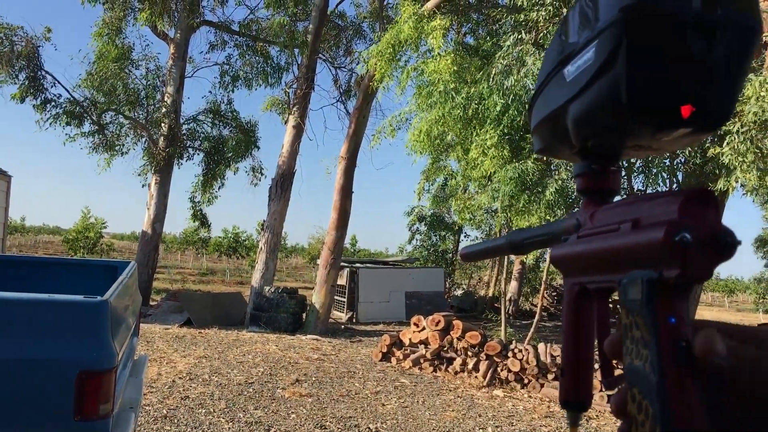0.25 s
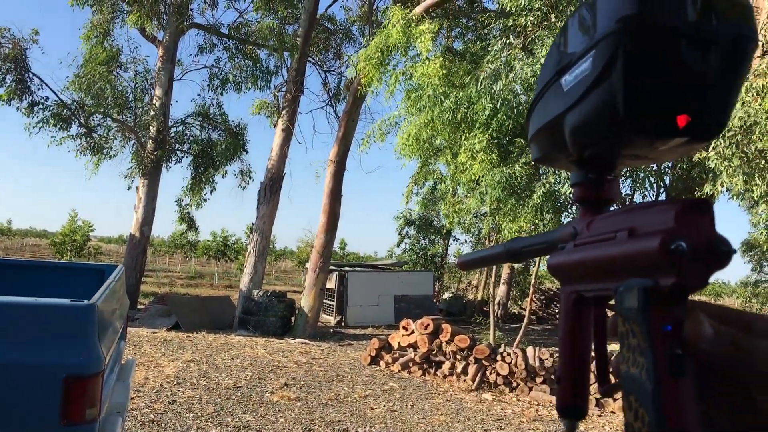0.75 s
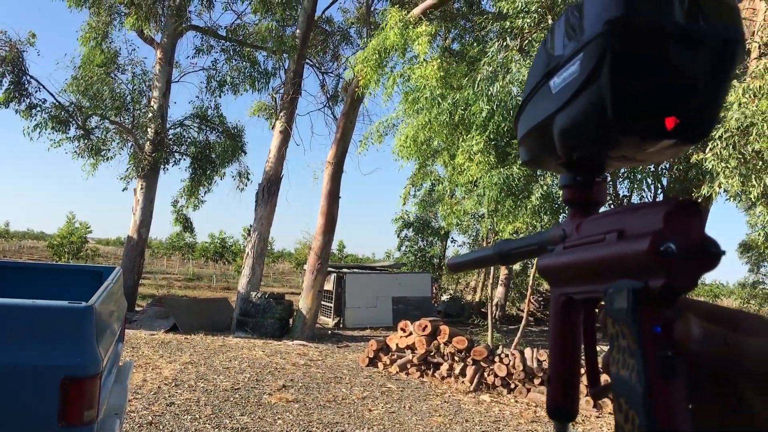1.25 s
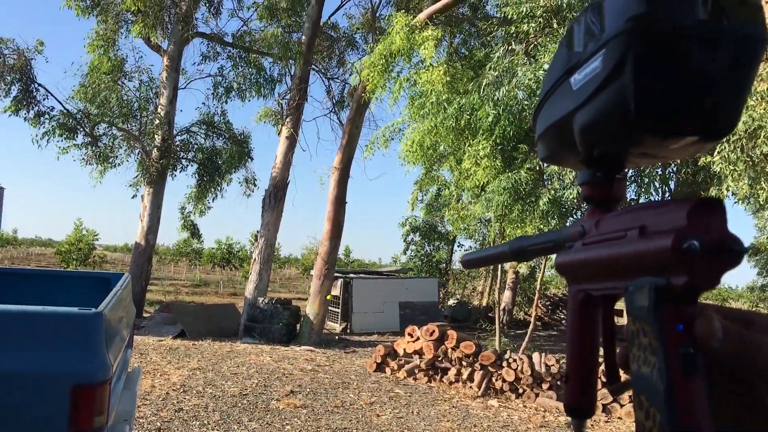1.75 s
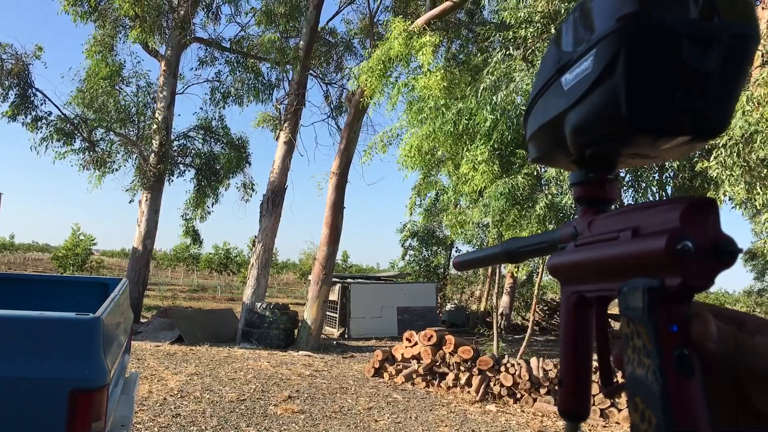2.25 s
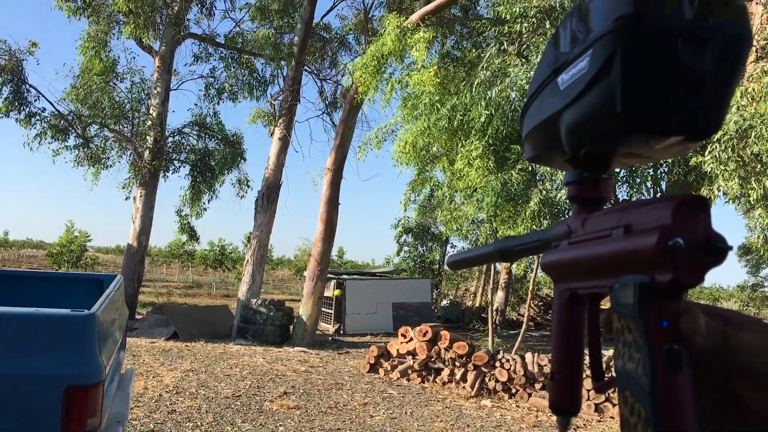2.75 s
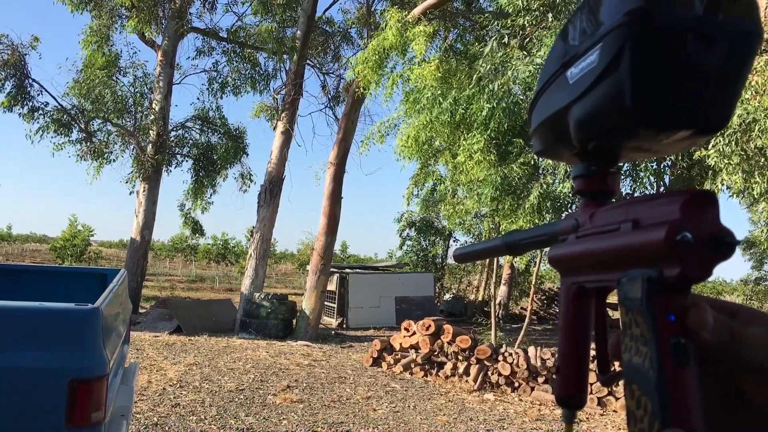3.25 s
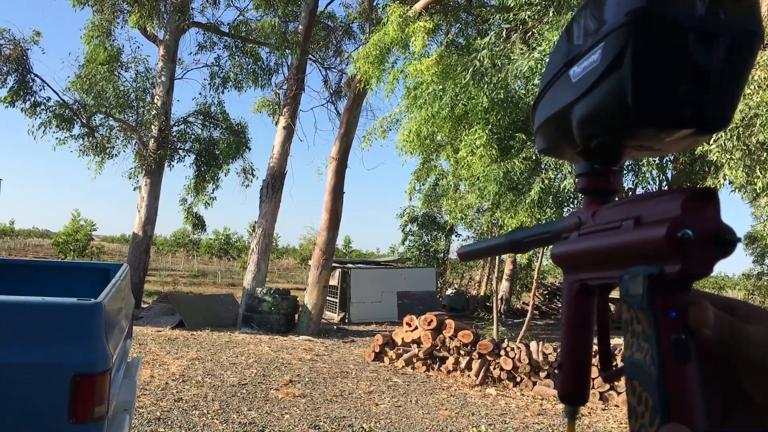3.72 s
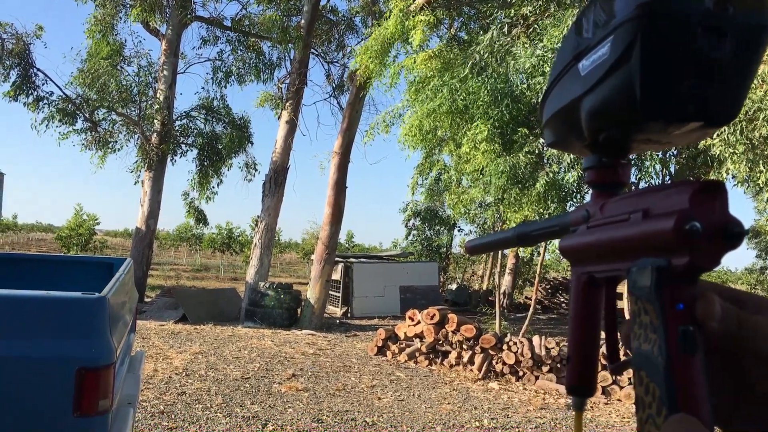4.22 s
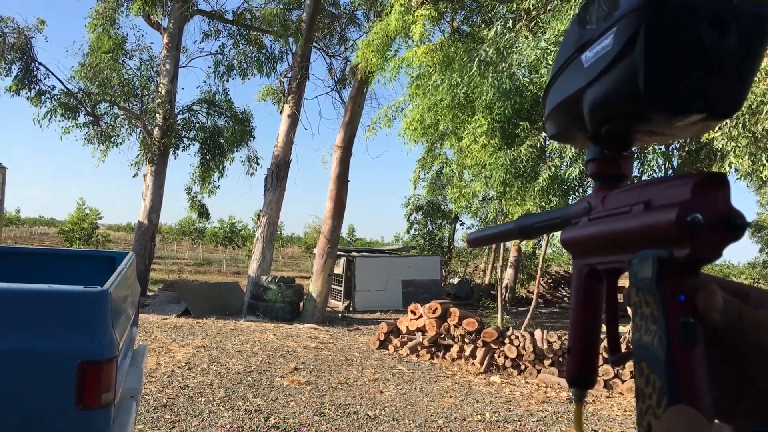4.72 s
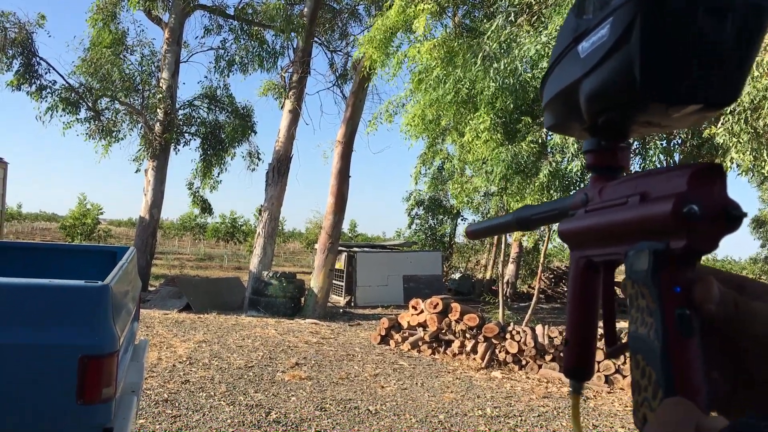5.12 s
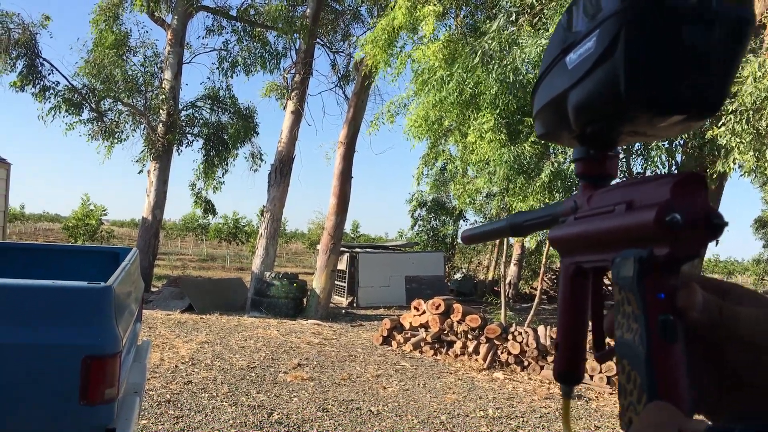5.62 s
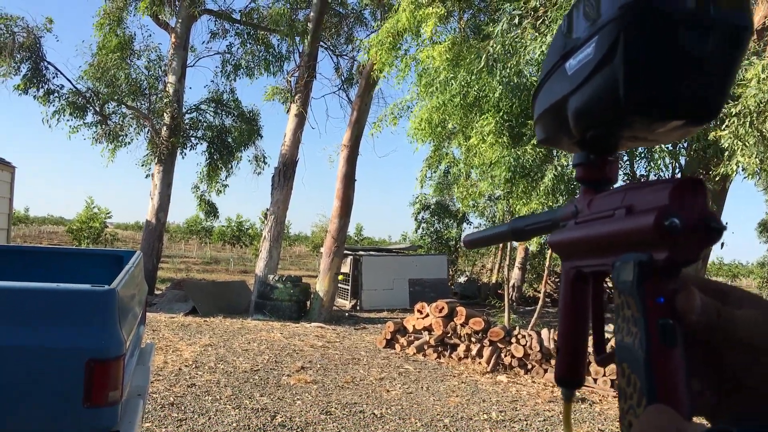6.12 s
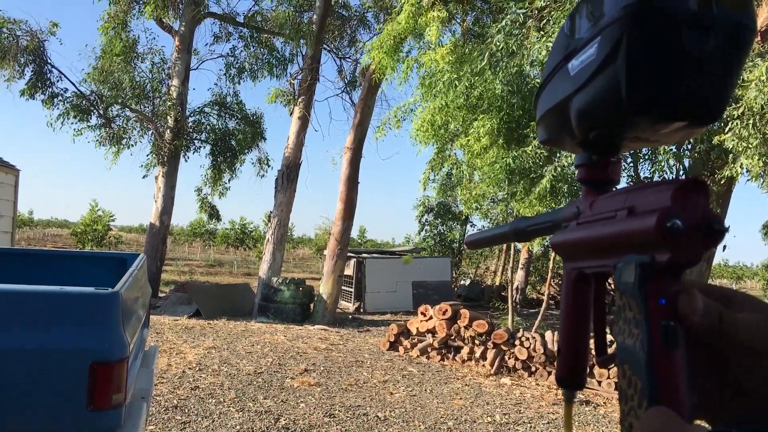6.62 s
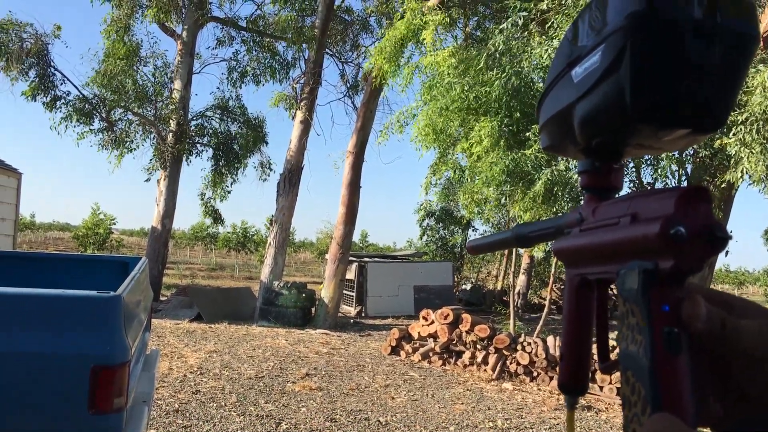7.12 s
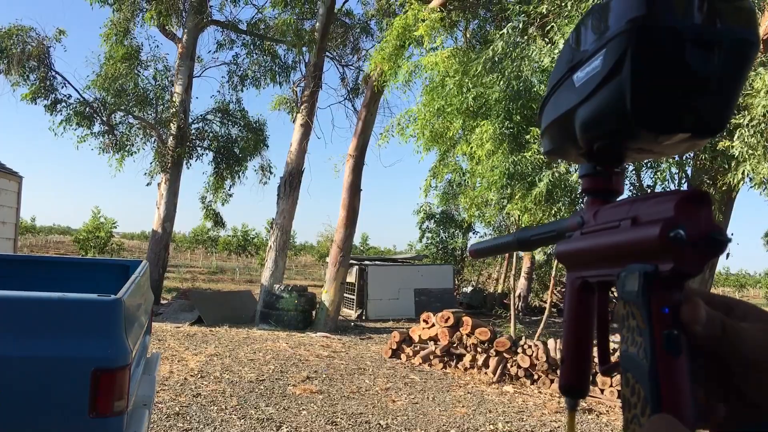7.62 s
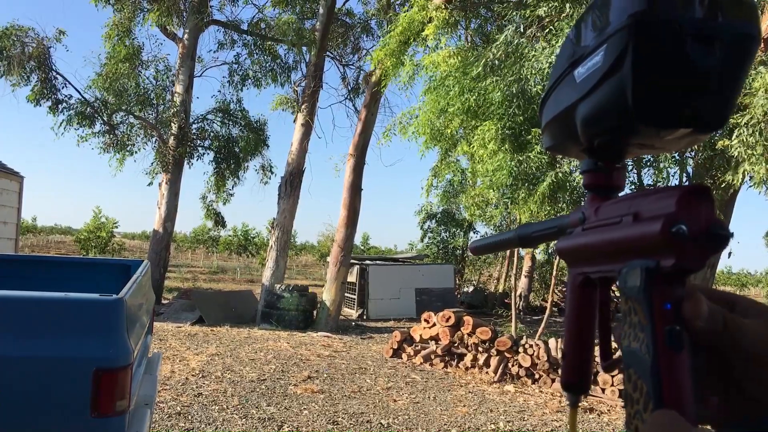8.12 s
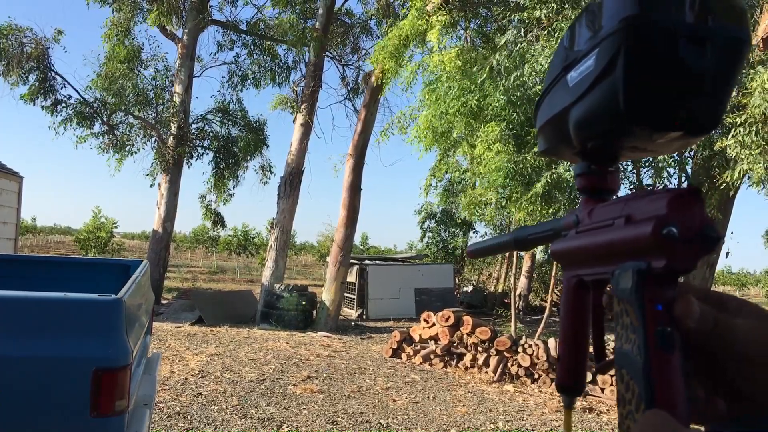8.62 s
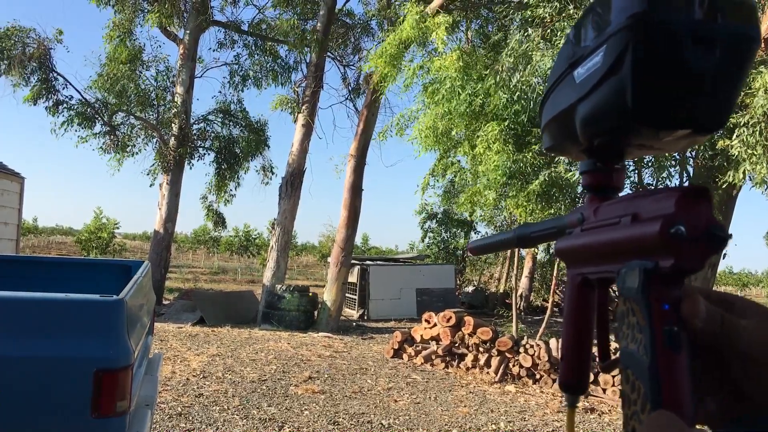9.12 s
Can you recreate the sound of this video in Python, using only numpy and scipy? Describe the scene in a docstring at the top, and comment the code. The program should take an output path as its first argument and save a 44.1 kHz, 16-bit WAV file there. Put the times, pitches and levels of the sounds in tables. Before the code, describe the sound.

Close electronic paintball gun outdoors: two single popping shots about a second apart, then a long rapid string of uneven clacking cracks and thumps.

```python
"""Paintball marker in a yard

A close electronic paintball marker fires two single shots, then a long string of up to 15 a second.
Each cycle is a clack of the bolt (a damped ring and noise), a crack and pop of gas with a sinking microphone
thump, a leak of gas and the bolt's return, all in noise bursts and rings; hard and soft shots alternate.
Faint random clicks fall between shots, balls smack and spatter on a target; decaying noise echoes are the trees.
Behind lie coloured noise for light wind, far air and hiss, soft handling knocks and one faint swept chirp.
"""
import sys
import numpy as np
from scipy import signal
from scipy.fft import rfft, irfft
from scipy.io import wavfile
from scipy.ndimage import uniform_filter1d

SR = 44100
rng = np.random.default_rng(int(sys.argv[2]) if len(sys.argv) > 2 else 0)


def unload_audio(sound):
    """Save the sound as a 16-bit wav file, at the path given as the first command line argument."""
    columns = np.transpose(np.atleast_2d(sound))
    # keep every value between -1 and 1, then stretch to whole-number steps
    steps = np.round(np.clip(columns, -1, 1) * 32767)
    wavfile.write(sys.argv[1], SR, steps.astype(np.int16))


N = 412776
T = np.arange(4096) / SR  # time within one short sound (s)
LEVEL_SAMPLES = 176  # the level of a short sound is its energy spread over this many samples
REST_S = .5  # after a longer pause than this the next shot is a first shot

# Pulls of the trigger. Each row: time in seconds, thump level in dB before the thump's own gain,
# pop level in dB before its trim, nominal pop pitch in Hz.
SHOTS = [(0.0396, -5.5, -17, 800), (1.0009, -1, -8, 980), (1.7368, -1.5, -7.5, 900),
         (1.8336, -1.0, -14, 750), (1.9128, -5.5, -15, 1090), (2.0005, -3.5, -7.5, 850),
         (2.0761, -5, -17, 656), (2.1572, -6, -11, 720), (2.2324, -6.5, -9, 980), (2.299, -1.5, -10.5, 650),
         (2.3716, -7, -32, 960), (2.4385, -4.5, -9, 680), (2.5354, -0.5, -10, 930),
         (2.6139, -2.5, -6.5, 796), (2.7094, -9, -20, 890), (2.7764, -12, -19, 980),
         (2.8433, -8.5, -20, 1030), (2.91, -4.5, -13.5, 930), (2.9771, -6, -11.5, 920),
         (3.044, -1, -2.5, 730), (3.1117, -6, -11.5, 820), (3.1787, -4.5, -8.5, 660),
         (3.2511, -7, -16, 880), (3.3176, -2, -13, 850), (3.3856, -1.5, -12.5, 1130), (3.4515, -2, -8, 720),
         (3.5523, -5, -19, 900), (3.6362, -2.5, -12, 600), (3.7179, -6, -10, 880), (3.7845, -1.5, -9, 610),
         (3.852, -6, -16, 776), (3.9216, -4.0, -8, 650), (3.9892, -10, -16, 815), (4.0559, -7.5, -7.5, 630),
         (4.1234, -6.0, -25, 880), (4.19, -3.5, -8.5, 670), (4.258, -7, -16, 780),
         (4.3631, -3.5, -7.5, 715), (4.4357, -4, -33, 1020), (4.5107, -2.5, -8, 694),
         (4.5844, -1.5, -14, 1010), (4.6507, -1, -7.5, 690), (4.7184, -6, -11, 910), (4.785, -4.0, -7, 740),
         (4.856, -5, -19, 656), (4.9301, -2.5, -8.5, 720), (4.9977, -4.5, -13.5, 740),
         (5.0643, -2.5, -7, 740), (5.132, -5.5, -23, 1020), (5.2045, -3.5, -7.5, 880),
         (5.2743, -4, -10, 980), (5.3436, -2, -10.5, 700), (5.4133, -6, -10.5, 810),
         (5.4803, -3, -10.5, 620), (5.5536, -4, -13, 910), (5.6225, -2.0, -7.5, 856), (5.69, -7, -23, 950),
         (5.7644, -1, -8.5, 550), (5.8329, -4, -11.5, 950), (5.9005, -3, -5.5, 710), (5.9702, -5, -14, 870),
         (6.0372, -3, -7.5, 610), (6.1364, -1, -14.5, 970), (6.205, -0.5, -8, 600),
         (6.2807, -2.5, -11.5, 1010), (6.3478, -2.5, -9, 760), (6.415, -5.5, -19, 860),
         (6.4821, -4.5, -9, 614), (6.5497, -12, -13, 890), (6.6167, -7, -26, 740), (6.6861, -1.5, -8, 740),
         (6.7538, -5.5, -10.5, 940), (6.8203, -1.5, -15, 775), (6.8882, -5.5, -12, 1010),
         (6.9548, -2, -8, 800), (7.022, -2.0, -31, 670), (7.089, -1, -16, 900), (7.1565, -2.5, -12.5, 1080),
         (7.2292, -1.5, -12, 715), (7.311, -5, -10.5, 910), (7.3774, -1.5, -11.5, 750),
         (7.448, -5.5, -15, 740), (7.552, -4.5, -7, 970), (7.6271, -7.5, -17, 1070), (7.696, -2, -8.5, 980),
         (7.7633, -5, -9.5, 1240), (7.8298, -4.5, -12.5, 920), (7.8974, -13, -17, 890),
         (7.969, -9, -12.5, 1050), (8.0357, -1, -8.5, 644), (8.103, -2.5, -30, 760),
         (8.1756, -1.5, -15, 670), (8.2551, -2.5, -31, 680), (8.3298, -1.5, -11, 630),
         (8.398, -5.5, -11, 815), (8.4643, -2, -12, 810), (8.5584, -1.5, -12, 620), (8.6723, -2.5, -8, 900),
         (8.745, -2, -13.5, 930), (8.8377, -2.5, -7, 810), (8.9054, -6.0, -18, 804),
         (8.9723, -8.5, -11, 860), (9.0394, -8.5, -11, 720), (9.109, -8.5, -11, 970),
         (9.1787, -4, -7.5, 720), (9.2542, -14, -10, 860), (9.3317, -7, -13, 820)]
# Target hits heard clearly, louder or in a pause. Each row: time in seconds, reference level in dB.
CLEAR_HITS = [(0.207, -17), (1.171, -22.5), (2.335, -30), (3.893, -36), (5.943, -35), (7.802, -32),
              (8.509, -33), (8.643, -36), (8.731, -33), (9.083, -34)]
# Colour of the returning bolt and of faint clicks. Each row: frequency in Hz, relative level in dB per Hz.
BOLT_AND_CLICK_COLOUR = [(150, 13.5), (700, -7), (1400, 0.5), (2200, -5.5), (3200, -4.5), (4400, -0.5),
                         (5200, -5), (7300, -6), (9500, -5), (10400, -7), (16000, -14.5)]


def amp(db):
    """Decibels to gain."""
    return 10 ** (np.asarray(db) / 20)


def read(points, hz):
    """A spectrum joined by straight lines on a log-frequency axis."""
    f, db = np.transpose(points)
    return np.interp(np.log(hz + 1), np.log(f + 1), db)


def add(mix, s, sound):
    """Mixes a sound in at time s."""
    part = mix[max(round(s * SR), 0):][:len(sound)]
    part += sound[:len(part)]


def sized(x):
    """Gives a short sound a level of 0 dB."""
    return x * np.sqrt(LEVEL_SAMPLES / (np.sum(x ** 2) + 1e-20))


def causal(points):
    """Minimum-phase response with this colour: it starts sharply and rings afterwards."""
    log_gain = np.log(amp(read(points, abs(np.fft.fftfreq(len(T), 1 / SR)))))
    return np.exp(signal.hilbert(log_gain).conj())[:len(T) // 2 + 1]


def puff(colour, rise, decay, ragged_db=3.0):
    """A ragged burst of turbulence that swells, dies away (both in seconds) and is coloured."""
    envelope = np.minimum(T / rise, 1) * np.exp(-np.maximum(T - rise, 0) / decay)
    eddies = uniform_filter1d(rng.standard_normal(len(T)), size=20)
    rush = amp(ragged_db * eddies / eddies.std()) * rng.standard_normal(len(T))
    return sized(irfft(rfft(envelope * rush) * colour))


def ring(hz, rise, decay, detune=.012):
    """One damped resonance, a little different in pitch and phase at every blow."""
    turns = hz * (1 + detune * rng.standard_normal()) * T + rng.random()
    envelope = (1 - np.exp(-T / rise)) * np.exp(-T / decay)
    return sized(envelope * np.sin(2 * np.pi * turns))


def noise(points):
    """Steady noise of rms 1 with this colour."""
    gain = amp(read(points, np.fft.rfftfreq(N, 1 / SR)))
    x = irfft(rfft(rng.standard_normal(N)) * gain, N)
    return x / x.std()


def marker():
    """Each cycle: bolt forward, gas out, valve shut, bolt back. Returns the sharp sounds and the thumps."""
    # Colours of the gas crack, leaking gas, bolt clack and a hollow knock.
    # Each row: frequency in Hz, relative level in dB per Hz.
    crack_colour = [(200, 9.5), (900, 0.5), (1600, 2), (2200, 1), (2900, -1.5), (3700, 0.5), (4900, -6),
                    (7000, -2), (8000, -6.5), (9400, -3), (10400, -9.5), (11700, -6.5), (13800, -5),
                    (16000, -22.5)]
    leak_colour = [(150, 14), (600, 11), (1300, 5), (2200, -5.5), (3800, 2), (4800, -2.5), (6800, -7.5),
                   (9300, 0), (10400, -6), (12000, -2), (16000, -4.5)]
    clack_colour = [(100, 21), (280, -10), (450, 9), (700, -15), (1050, -1), (1250, -22), (1600, 11),
                    (2100, -21), (3500, -15), (7000, -15), (16000, -26)]
    hollow_colour = [(150, 2), (300, 9), (500, 3), (750, -3), (1000, -2), (1400, -17), (2000, 1),
                     (5000, -24.5), (16000, -47)]
    crack, leak, clack = causal(crack_colour), causal(leak_colour), causal(clack_colour)
    hollow, back = causal(hollow_colour), causal(BOLT_AND_CLICK_COLOUR)
    sharp, low = np.zeros(N), np.zeros(N)
    for shot, (rested, hard, early_db) in zip(SHOTS, cycles()):
        s, thump_db = shot[:2]
        if rested:
            first_clatter(sharp, low, s, crack, back, leak, hollow)
        bolt_forward(sharp, s, rested, early_db, clack)
        muzzle_blast(sharp, shot, rested, hard, crack, leak)
        # hard and soft shots thump in opposite directions
        add(low, s, -hard * amp(thump_db) * thump(stretch=1.12 if rested else 1))
        valve(sharp, s, crack, leak)
        bolt_return(sharp, s, rested, early_db, back)
    return sharp, low


def cycles():
    """Rows: after a rest?, hard (1) or soft (-1), extra dB of bolt sound early in a string, fading."""
    start_db, fade_s = 6, 0.65  # extra bolt sound at the start of a string, and its time constant
    dud_db = -12.3  # a hard shot follows one with less thump than this
    rows, last_s, last_db, first_s, hard = [], -np.inf, 0, 0, 1
    for s, thump_db, _, _ in SHOTS:
        rested = s - last_s > REST_S
        first_s = s if rested else first_s
        hard = 1 if rested or last_db < dud_db else -hard
        rows.append((rested, hard, start_db * np.exp(-(s - first_s) / fade_s)))
        last_s, last_db = s, thump_db
    return rows


def first_clatter(sharp, low, s, crack, back, leak, hollow):
    """After a rest the trigger and the bolt clatter far more, with a hollow knock."""
    add(sharp, s - .023, amp(-36) * puff(crack, rise=0.00067, decay=0.0054))
    add(sharp, s - .0145, amp(-23.0) * puff(back, rise=.002, decay=0.018))
    add(sharp, s + .02, amp(-22.5) * puff(leak, rise=0.0033, decay=0.036))
    add(sharp, s - .002, amp(-15.5) * puff(hollow, rise=.004, decay=.022))
    add(low, s - .011, amp(-19) * thump())


def bolt_forward(sharp, s, rested, early_db, clack):
    """The bolt knocks a ball into the breech: a short ring and a clack, then air pushed ahead of the ball."""
    knock_db = -14.5 if rested else -37.5 + early_db + 1.7 * rng.standard_normal()
    add(sharp, s - .0118, amp(knock_db) * ring(835, rise=0.00018, decay=0.0011, detune=0.051))
    add(sharp, s - .0112, amp(knock_db - 1.5) * puff(clack, rise=0.00022, decay=0.0018))
    add(sharp, s - .0045, amp(-26) * puff(clack, rise=0.0042, decay=0.00056))  # pushed air


def muzzle_blast(sharp, shot, rested, hard, crack, leak):
    """The ball leaves and the gas behind it bursts out: crack, pop, shell ring, rush and barrel whistle."""
    s, thump_db, pop_db, pop_hz = shot
    # gas spent on thump and pop beyond a usual -4 and -12 dB is lost to the crack
    spent_db = 0.21 * (thump_db + 4) + 0.11 * (pop_db + 12)
    alternate_db = 0.55  # a hard shot cracks this much more, a soft one this much less
    crack_db = (-11.5 if rested else -14) + hard * alternate_db - spent_db
    add(sharp, s - .0004, amp(crack_db - 1) * puff(crack, rise=0.00073, decay=0.00093))
    add(sharp, s + .0008, amp(crack_db + 0.5) * puff(crack, rise=0.001, decay=0.0011))
    pop_trim_db = 7 if rested else 4
    add(sharp, s, amp(pop_db - pop_trim_db) * ring(pop_hz, rise=0.00095, decay=0.00096))
    add(sharp, s, amp(-30) * body())
    add(sharp, s + .002, amp(-15) * puff(leak, rise=0.0016, decay=0.0024))
    whistle = ring(7250, rise=0.0014, decay=0.00076, detune=0.019)
    add(sharp, s + .0039, amp(-22.5 + 2 * rng.standard_normal()) * whistle)


def thump(stretch=1, scatter=0.035):
    """The microphone passes the deepest part of a puff last, so it sweeps down."""
    start_hz, end_hz, sink_s = 326.6, 43.8, 0.0032  # pitch at stretch 1; halfway down after sink_s
    rise_s, fade_s, fade_power, gain_db = 0.0033, 0.02, 1.69, 2.5
    t = T / stretch
    hz = end_hz + (start_hz - end_hz) / (1 + (t / sink_s) ** 2)
    turns = np.cumsum(hz) / SR / stretch + scatter * rng.standard_normal()
    envelope = (1 - np.exp(-(t / rise_s) ** 2)) * np.exp(-(t / fade_s) ** fade_power)
    return amp(gain_db) * envelope * np.cos(2 * np.pi * turns)


def valve(sharp, s, crack, leak):
    """The valve shuts with a click and the rest of the gas leaks away."""
    add(sharp, s + 0.0071, amp(-31.5 + 2 * rng.standard_normal()) * puff(crack, rise=0.00027, decay=0.00063))
    add(sharp, s + 0.0055, amp(-28) * puff(leak, rise=0.0025, decay=0.021))


def bolt_return(sharp, s, rested, early_db, back):
    """The bolt slams back, sooner and louder on a first shot, rebounds and rings the shell."""
    return_db = -13 if rested else -26.5 + early_db + 1.3 * rng.standard_normal()
    return_s = s + (.016 if rested else .0202) + .0005 * rng.standard_normal()
    add(sharp, return_s, amp(return_db + 0.5) * puff(back, rise=0.00097, decay=0.002))
    click_db = return_db - 8.5 + 5.3 * rng.standard_normal()
    add(sharp, return_s, amp(click_db) * puff(back, rise=0.00018, decay=0.00056))
    rebound_s = return_s + rng.uniform(0.0022, .008)
    rebound_db = return_db - 11 + 2.5 * rng.standard_normal()
    add(sharp, rebound_s, amp(rebound_db) * puff(back, rise=.0002, decay=0.00064))
    add(sharp, return_s, amp(-37.5) * body())


def body():
    """The marker's shell and barrel ringing after a blow: a sum of damped resonances."""
    # Each row: nominal frequency in Hz, relative level in dB, time to decay by 60 dB in seconds.
    modes = [(266, 3.5, 0.079), (302, -0.5, 0.08), (974, -1, 0.058), (1402, 1, 0.032), (3900, -26.5, .04),
             (5130, -11, .06), (6580, -5, 0.066), (7650, -11.5, 0.066), (8830, -6, 0.049)]
    return sum(amp(db) * ring(hz, rise=0.00045, decay=t60 / np.log(1000)) for hz, db, t60 in modes)


def string():
    """Times of the shots that follow closely on another."""
    s = np.array([row[0] for row in SHOTS])
    return s[1:][np.diff(s) < REST_S]


def faint_clicks(db=-46, spread_db=4.0, count=2):
    """Faint random clicks between the shots: very short noise bursts after each closely following shot."""
    out, click = np.zeros(N), causal(BOLT_AND_CLICK_COLOUR)
    for s in string():
        for _ in range(count):
            click_s = s + rng.uniform(0.028, .055)
            click_db = db + spread_db * rng.standard_normal()
            add(out, click_s, amp(click_db) * puff(click, rise=0.00027, decay=0.00089))
    return out


def target():
    """Each ball that hits gives a sharp smack, then its paint and shell spatter in two longer bursts."""
    # Colours of the smack and the spatter. Each row: frequency in Hz, relative level in dB per Hz.
    smack_colour = [(200, -14), (800, -1.5), (1300, -11.5), (1900, -2), (3200, 1.5), (4600, -6), (6100, 0),
                    (7200, -9), (8500, -5.5), (12000, -8), (16000, -18)]
    spatter_colour = [(300, -8), (1400, -3.5), (2500, 2.5), (3300, 4), (4500, -7), (6000, -2.5),
                      (9000, -15), (16000, -19)]
    out, smack, spatter = np.zeros(N), causal(smack_colour), causal(spatter_colour)
    for s, db in np.vstack([CLEAR_HITS, other_hits()]):
        add(out, s, amp(db + 1) * puff(smack, rise=.0003, decay=.0008))
        add(out, s + 0.0037, amp(db - 14) * puff(spatter, rise=0.015, decay=0.036))
        add(out, s + 0.034, amp(db - 16.5) * puff(spatter, rise=0.019, decay=0.049))
    return out


def other_hits():
    """Other hits, one flight after their shot: rows (s, dB), leaving out those near a clear hit."""
    flight_s, flight_spread_s = .1765, .004  # muzzle to target, varying this far either way
    share, level_db, spread_db = .8, -36.5, 0.5  # share that hits, level, variation either way
    due = string() + flight_s
    late, strength, chance = rng.random((len(due), 3)).T
    clear = abs(due[:, None] - np.transpose(CLEAR_HITS)[0]).min(1) < .02
    hit_s = due + flight_spread_s * (2 * late - 1)
    hit_db = level_db + spread_db * (2 * strength - 1)
    return np.column_stack([hit_s, hit_db])[(chance < share) & ~clear]


def yard(x, build_s, low_t60, high_t60):
    """Sparse echoes from ground, trunks and leaves; treble dies first and the paths shift all the time."""
    # Colour of the scattered sound. Each row: frequency in Hz, relative level in dB.
    trees_colour = [(100, -13), (300, -20), (1000, -5.5), (2500, -4.5), (6000, -2.5), (10000, 3.5),
                    (16000, -0.5)]
    taps = rng.standard_normal((3, SR)) * (rng.random((3, SR)) < .1)
    hz, t, z = signal.stft(taps, SR, nperseg=256)
    t60 = read([(500, low_t60), (12000, high_t60)], hz)[:, None]
    z = z * amp(read(trees_colour, hz)[:, None] - 60 * t / t60) * np.minimum(t / build_s, 1)
    tails = signal.istft(z, SR, nperseg=256)[1]
    # the sound is shared among three tails in turning proportions
    turn = np.arange(N) * 7 / SR + np.arange(3)[:, None] / 3
    shares = np.sqrt(2 / 3) * np.cos(np.pi * turn)
    return signal.fftconvolve(x * shares, tails / np.linalg.norm(tails[0]), axes=1).sum(0)[:N]


def bird(high_hz=4450, low_hz=3350, waver_hz=260, buzz_hz=310, buzz=0.6, db=-59, count=3):
    """One far buzzing chirp that falls in pitch, in a few strands that waver apart."""
    out, t = np.zeros(N), np.arange(0, .12, 1 / SR)
    for _ in range(count):
        waver = uniform_filter1d(uniform_filter1d(rng.standard_normal(len(t)), size=300), size=200)
        hz = high_hz + (low_hz - high_hz) * t / t[-1] + waver_hz * waver / waver.std()
        song = np.sin(2 * np.pi * np.cumsum(hz) / SR) * (1 + buzz * np.sin(2 * np.pi * buzz_hz * t))
        add(out, .797, amp(db) * signal.windows.tukey(len(t), .5) * song)
    return out


def handling():
    """The hand shifting its grip: soft low knocks and one scuff of coloured noise."""
    # Each row: time in seconds, knock level in dB before the thump's own gain.
    bumps = [(.503, -27), (0.636, -10.5), (0.839, -21), (0.922, -23)]
    out = np.zeros(N)
    for s, db in bumps:
        add(out, s, amp(db) * thump())
    scuff = causal([(200, -9), (600, 2), (1100, 5), (1800, -15), (5000, -29), (14000, -43)])
    add(out, .695, amp(-30.5) * puff(scuff, rise=0.017, decay=0.013))
    return out


def outdoors():
    """Gusts on the microphone, steady far air and a faint hiss: coloured noises, two with moving levels."""
    # Colours of wind, far air and hiss. Each row: frequency in Hz, relative level in dB per Hz.
    wind_colour = [(20, -17), (45, -0.5), (75, 4.5), (140, -2.5), (220, -14), (400, -21.5), (1000, -47.5),
                   (3000, -86)]
    air_colour = [(150, -2.5), (300, -0.5), (700, -6.5), (1200, -8.5), (2000, -17), (3200, -25),
                  (4500, -25.5), (9000, -35), (16000, -42)]
    hiss_colour = [(1000, -7.5), (2500, 3), (4400, 0.5), (6000, -2.5), (7600, -7), (9000, -2.5),
                   (10500, -11), (16000, -2)]
    # Levels of wind and hiss. Each row: time in seconds, level in dB.
    gust_levels = [(0, -29), (.2, -48), (.3, -31), (.4, -45.5), (.55, -35.5), (.77, -29.5), (.95, -36.5),
                   (1.12, -52), (1.35, -47), (1.65, -38), (2.5, -53), (9.3, -64.5)]
    hiss_levels = [(0, -62), (.25, -63), (.58, -60), (.66, -67), (.95, -78), (1.25, -65), (1.7, -60),
                   (9.3, -51)]
    t = np.arange(N) / SR
    wind = noise(wind_colour) * amp(np.interp(t, *np.transpose(gust_levels)))
    air = noise(air_colour) * amp(-52)
    hiss = noise(hiss_colour) * amp(np.interp(t, *np.transpose(hiss_levels)))
    return wind + air + hiss


def scene():
    """The near marker is almost dry; the target and the bird stand among the trees."""
    sharp, low = marker()
    sharp = sharp + faint_clicks()
    far = target() + bird()
    near_echo = amp(-22.0) * yard(sharp, build_s=0.0057, low_t60=0.51, high_t60=0.17)
    wide_echo = amp(-31.5) * yard(sharp, build_s=.08, low_t60=1.5, high_t60=0.79)
    far_echo = amp(-16) * yard(far, build_s=0.04, low_t60=0.8, high_t60=0.31)
    background = handling() + outdoors()
    return (sharp + low + far + near_echo + wide_echo + far_echo + background)[None]


def record(dry, knee=0.27):
    """Peaks above the knee are rounded off; then a low-pass sets the band limit."""
    over = np.maximum(abs(dry) - knee, 0)
    rounded = np.minimum(abs(dry), knee) + (1 - knee) * np.tanh(over / (1 - knee))
    held = np.sign(dry) * rounded
    lowpass = signal.firwin(255, 16100, window=("kaiser", 9), fs=SR)  # cutoff in Hz
    return signal.oaconvolve(held, lowpass[None], "same")


dry = scene()
out = record(dry)
unload_audio(out)
```